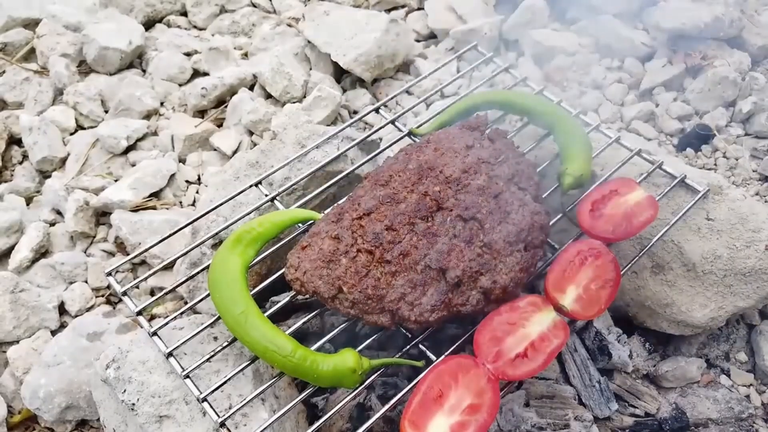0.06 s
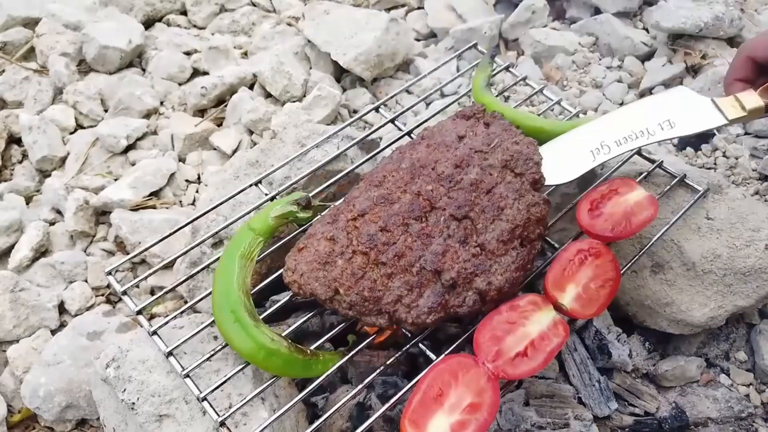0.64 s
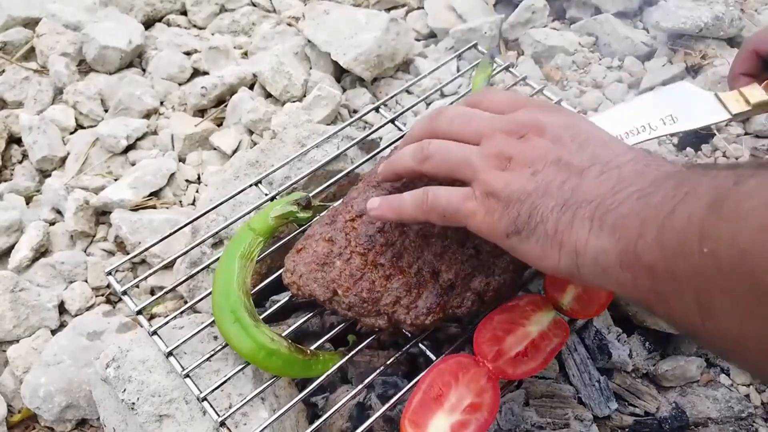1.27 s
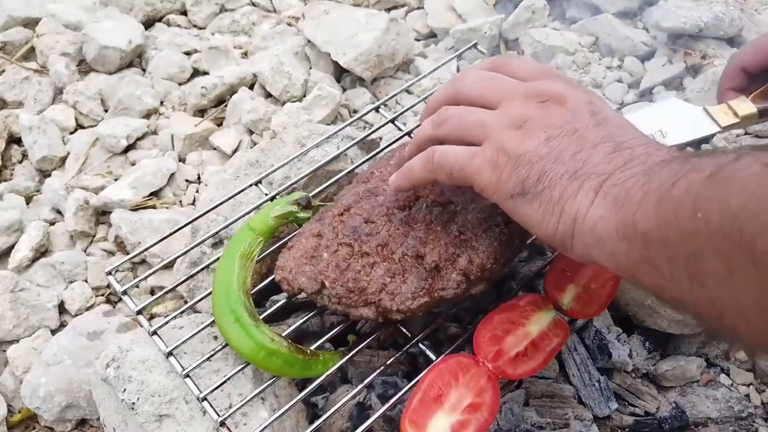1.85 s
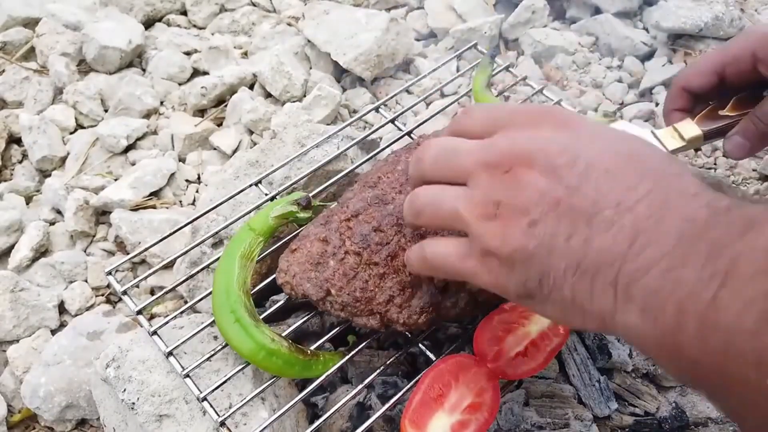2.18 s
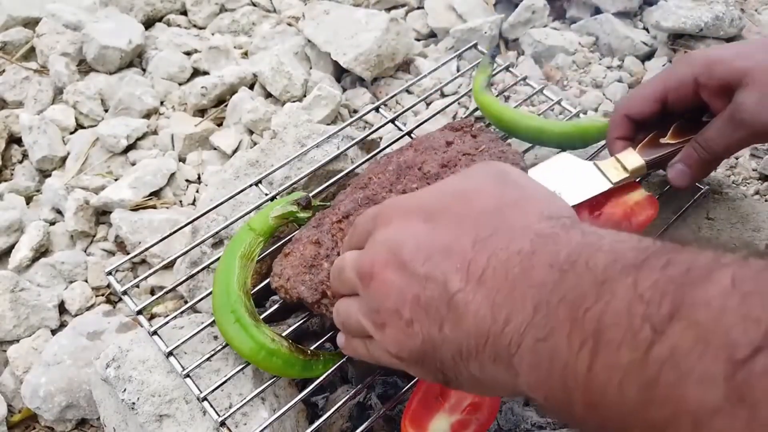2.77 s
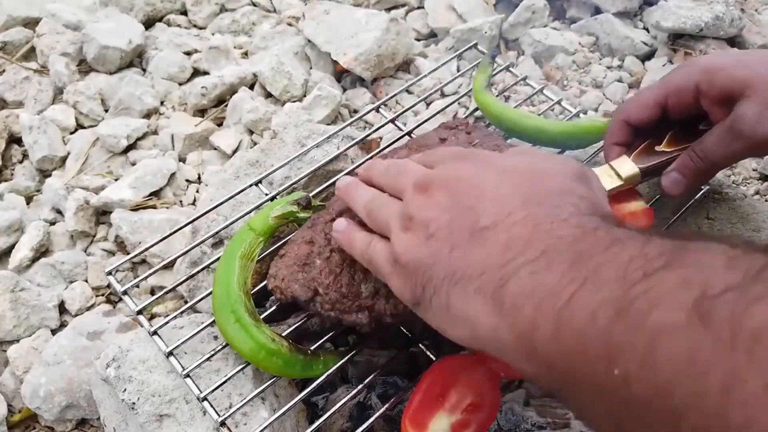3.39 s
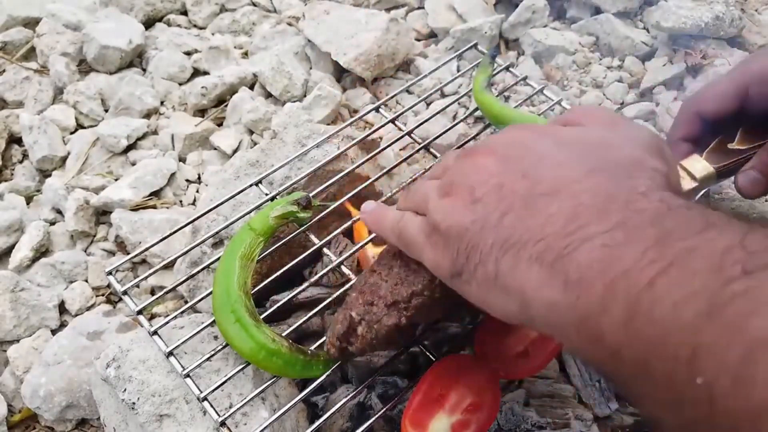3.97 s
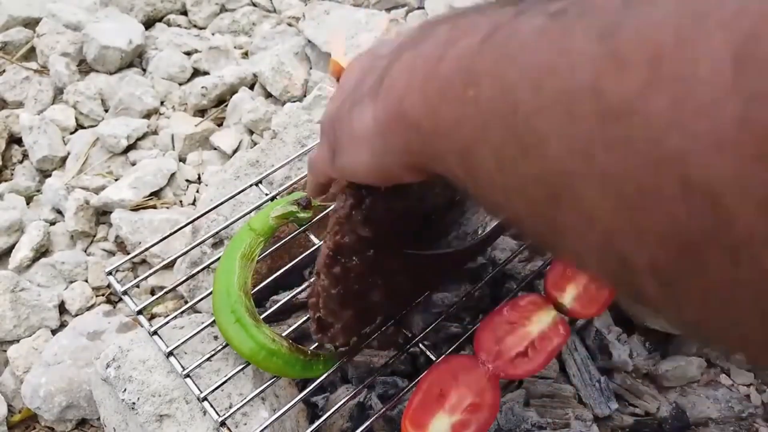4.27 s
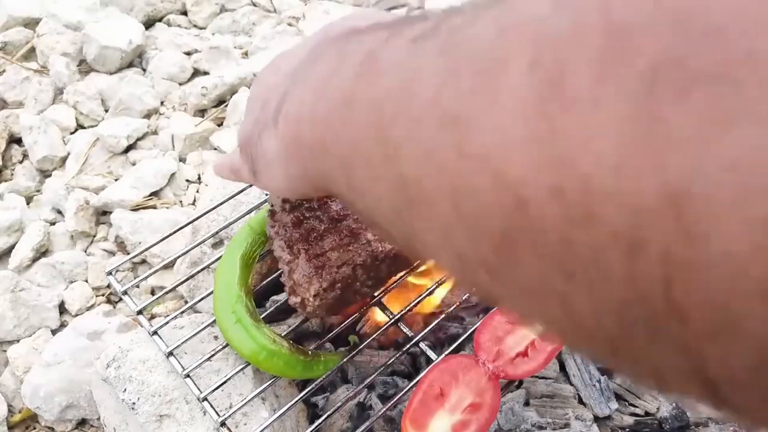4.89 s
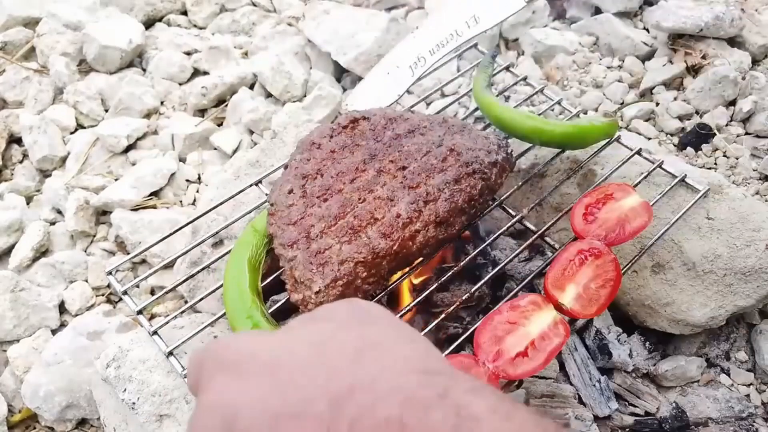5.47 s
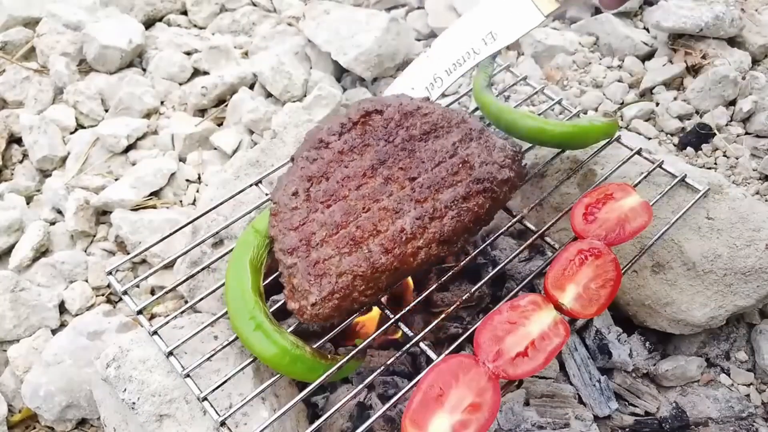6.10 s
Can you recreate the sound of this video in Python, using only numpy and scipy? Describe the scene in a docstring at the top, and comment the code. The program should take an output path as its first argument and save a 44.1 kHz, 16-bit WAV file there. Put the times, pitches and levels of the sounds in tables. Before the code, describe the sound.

Close up at an outdoor charcoal grill, a faint simmer of cooking meat grows into uneven waves of hissing, dotted with small pops of fat. A few light knocks come from a knife and the patty on the wires, while flames puff underneath. The meat is flipped and sears with a quick run of crackles, then eases back to a quiet sizzle. A low breeze brushes the microphone throughout.

```python
"""Outdoors at a charcoal grill, a meat patty sizzles on the wires as it is pressed and turned over.
Countless bursting bubbles of fat merge with a hiss of steam, surging as juice boils off the embers.
Cavities under a cupped hand and the tilted patty colour the sizzle by resonance. Single pops crack,
drops spit, the turned side sears, and knife and meat bump the grill. Beneath it all, flames flutter
and light air rumbles on the microphone."""
import sys
import numpy as np
from scipy import signal
from scipy.fft import rfft, irfft, next_fast_len
from scipy.io import wavfile

SR = 44100
rng = np.random.default_rng(int(sys.argv[2]) if len(sys.argv) > 2 else 0)


def dump(signal):
    """Clip the signal to [-1, 1] and save it as 16-bit WAV at the path in sys.argv[1]."""
    limited = np.clip(np.atleast_2d(signal).T, -1, 1)
    pcm = np.round(limited * 32767).astype(np.int16)
    wavfile.write(sys.argv[1], SR, pcm)


N = 275184
TIME = np.arange(N) / SR

# Spectral envelopes of four noise sources. Each row: frequency in Hz, gain in dB.
SIZZLE_SPECTRUM = [(500, -5), (1000, -5.5), (1350, -5.5), (1900, -4), (2250, -5), (3200, -1.5),
                   (4200, -0.5), (5200, 2.5), (6000, 0.5), (8600, 0.5), (10000, -6), (11800, -9.5),
                   (12800, -26), (15500, -25)]
SEAR_SPECTRUM = [(150, -7), (450, 6), (700, -8), (1030, -10), (1500, -3.5), (2300, -6.5), (5200, -10.5),
                 (8000, -15), (12000, -18.5), (13000, -23)]
FLAME_SPECTRUM = [(50, -13), (100, -2.5), (155, 0.5), (260, -2.5), (400, -9), (520, -13), (680, -8),
                  (850, -16.5), (1050, -28), (2000, -34)]
BREEZE_SPECTRUM = [(8, -4.5), (18, -3), (28, 0), (45, -9.5), (75, -13), (105, -19), (160, -20),
                   (500, -58.5)]
# The quiet, continuous simmer. Each row: time in seconds, level in dB, fine spray in relative dB.
SIMMER_LEVELS = [(0.0, -63, -4.5), (1.5, -62, -1), (2.5, -65.5, -1.5), (3.1, -58.5, -5.5), (5.6, -70, -5),
                 (6.24, -63, -3)]
# Juice boils off on the embers. Each row: start in seconds, level in dB, rise, hold and fade in seconds,
# fine spray and coarse bubbling in relative dB.
JUICE_SURGES = [(0.601, -50.5, 0.051, 0.09, .11, -9.5, -13.5), (0.898, -58, .11, 0.13, .12, 1, -6.5),
                (1.107, -53.5, 0.026, .03, 0.087, 3.5, -14), (1.792, -54, 0.081, 0.3, 0.44, -4.5, -9),
                (2.626, -57.5, 0.017, 0.034, 0.2, -5, -6.5), (3.246, -55.5, .14, .15, 0.87, 0.5, -2.5),
                (3.625, -48.5, 0.026, .02, 0.08, -4, -9.5), (3.792, -48, 0.026, 0.04, 0.13, -6, -6),
                (4.097, -49.5, 0.1, 0.057, 0.12, -7.5, -3.5), (4.267, -54, 0.097, 0.2, 0.18, -1, -6),
                (4.685, -57.5, 0.014, 0.52, 0.6, -8.5, -10.5), (4.99, -50.5, 0.053, 0.092, 0.11, -7, -27),
                (5.855, -60, 0.0098, 0.017, 0.021, -12, -1.5), (6.034, -60, 0.057, 0.044, 0.047, 1, -16)]
# Cavities under the hand and the tilted patty. Each row: centre in Hz, bandwidth in Hz, gain in dB.
HAND_RESONANCES = [(1054, 310, -7.5), (1340, 400, 8), (1960, 250, 2), (2230, 550, -4), (3250, 380, 4),
                   (5020, 720, 2.5), (6560, 470, 2)]
TILT_RESONANCES = [(5480, 330, 5), (8540, 2200, 3.5), (9900, 600, -6.5)]
# The loudest pops of fat and charcoal, and the bumps of knife and meat on the grill.
# Each row: start in seconds, relative level in dB, centre in Hz, 60 dB decay time in seconds.
FAT_POPS = [(0.183, -30, 2670, 0.0088), (0.523, -35.5, 7500, 0.058), (0.568, -37, 5300, .015),
            (2.178, -21.5, 6240, 0.0073), (2.186, -21.5, 6500, 0.011), (2.279, -28.5, 4300, .025),
            (2.452, -34, 4720, 0.014), (3.026, -27, 1970, 0.013), (3.477, -30, 1430, 0.065),
            (3.906, -25, 3750, 0.0098), (4.745, -26.5, 3250, 0.04), (4.756, -22, 6200, 0.021),
            (4.915, -27, 4830, 0.045), (5.016, -25, 4150, 0.026), (5.025, -29, 5030, 0.017),
            (5.063, -18.5, 4900, 0.0068), (5.091, -19.5, 7120, 0.018), (5.118, -27, 5360, 0.037),
            (5.288, -28, 5230, .012), (5.317, -31, 4770, 0.08), (5.583, -41, 5280, 0.059),
            (5.622, -41.5, 1900, 0.006), (5.852, -31, 5630, 0.041), (5.966, -33.5, 4360, 0.0073),
            (6.173, -33.5, 3500, 0.024)]
GRILL_BUMPS = [(2.451, -38.5, 676, 0.022), (3.026, -41.5, 770, 0.038), (3.041, -38.5, 1420, 0.02),
               (4.953, -39, 55, 0.09), (4.953, -37.5, 126.5, 0.16), (4.992, -37.5, 320, 0.03),
               (5.379, -38, 563, 0.02)]
# Drops flashing to steam, and puffs of flame.
# Each row: peak time in seconds, half length in seconds, centre in Hz, bandwidth in Hz, level in dB.
VAPOUR_JETS = [(0.202, 0.025, 970, 900, -58), (0.185, 0.012, 4200, 3000, -55.5),
               (0.194, 0.049, 413, 252, -59.5), (0.476, 0.012, 790, 296, -63),
               (0.75, 0.098, 725, 383, -59.5), (1.044, 0.05, 8340, 890, -52.5),
               (1.054, 0.074, 6340, 686, -53.5), (2.5, 0.077, 614, 450, -64.5),
               (3.672, 0.025, 2780, 890, -49), (4.198, 0.063, 4370, 2010, -49.5),
               (4.202, 0.017, 640, 397, -55), (5.089, 0.013, 5460, 300, -42),
               (6.125, 0.045, 3900, 1500, -54.5)]
# Fat catching fire, and gusts of air. Each row: start in seconds, level in dB, fade in seconds.
FAT_FLARES = [(0.8, -61.5, 0.11), (1.0, -61, 0.51), (2.02, -51.5, 0.13), (2.41, -55, 0.06),
              (3.25, -58.5, 0.6), (3.45, -55.5, 0.061), (3.638, -48, 0.11), (3.805, -46.5, 0.088),
              (3.92, -51, 0.086), (4.18, -51, 0.21), (4.935, -53, 0.38), (5.34, -60, 0.27)]
AIR_GUSTS = [(0.23, -55.5, .04), (0.78, -50, 0.39), (1.3, -51.5, 0.26), (2.05, -50.5, 0.23),
             (2.38, -48.5, .18), (3.22, -50, 0.048), (3.45, -50, 1), (3.93, -45.5, 0.14), (4.3, -54, 0.26),
             (4.5, -48, 0.056), (4.72, -48, 0.083), (4.92, -44, .07)]


def sizzle(strengths):
    """Steam noise and bursting bubbles superpose; bubbles of different sizes swell in separate bands."""
    steam = undb(-7.5) * rng.standard_normal(N)
    fizz = undb(-3.5) * clicks(per_s=5000, spread_db=2.5)
    spatter = undb(-7) * crackle(per_s=250, spread_db=4, fade_s=0.0023)
    ticking = undb(-7.5) * pores(low_hz=1225, high_hz=14000, width_hz=50, swell_db=9, count=52)
    sound = colour(steam + fizz + spatter + ticking, SIZZLE_SPECTRUM)
    sound = cavity(sound, HAND_RESONANCES, start_s=1.73, end_s=5.5)
    sound = cavity(sound, TILT_RESONANCES, start_s=4.1, end_s=5.28)
    coarse, rest = split(sound, hz=2350)
    middle, spray = split(rest, hz=6730)
    sputter_db = 0.37 * walk(per_s=25)
    return sum(unit(band) * strength * undb(sputter_db + 0.25 * walk(per_s=37))
               for band, strength in zip((coarse, middle, spray), strengths))


def boiling():
    """Incoherent sources add in power: simmer plus surges give coarse, middle and spray amplitudes."""
    times, *columns = np.transpose(SIMMER_LEVELS)
    base_db, fine_db = (np.interp(TIME, times, column) for column in columns)
    before_jump = TIME < 0.334  # here the sound cuts abruptly from faint to louder
    base_db, fine_db = base_db - 5 * before_jump, fine_db - 0.5 * before_jump
    power = undb([base_db - 5.5, base_db, base_db + fine_db]) ** 2
    for start, db, rise_s, hold_s, fade_s, spray_db, coarse_db in JUICE_SURGES:
        band_gains = undb([db + coarse_db, db, db + spray_db])
        power += np.outer(band_gains, swell(start, rise_s, hold_s, fade_s)) ** 2
    return np.sqrt(power)


def pores(low_hz, high_hz, width_hz, swell_db, count):
    """Each pore in the meat is a narrow resonator, driven by impulses that wax and wane on their own."""
    out = 0
    for hz in np.linspace(low_hz, high_hz, count) + rng.uniform(-100, 100, count):
        ticks = clicks(per_s=110, spread_db=3.5) * undb(swell_db * np.tanh(walk(per_s=9)))
        out = out + resonate(ticks, hz, width_hz)
    return unit(out)


def cavity(sound, modes, start_s, end_s, move_s=0.28):
    """An air cavity boosts some bands by resonance and weakens others, for as long as it is formed."""
    present = np.clip(np.minimum(TIME - start_s, end_s - TIME) / move_s + 0.5, 0, 1)
    for hz, width, db in modes:
        sound = sound + present * (undb(db) - 1) * resonate(sound, hz, width)
    return sound


def impacts(table, tone_db, crack_db, crack_t60_s):
    """Impulsive excitation: a pop or bump is a broadband crack, a rough burst and a damped ring."""
    out = np.zeros(N + SR)
    t = np.arange(SR // 5) / SR
    for (s, db, hz, t60), noise in zip(table, rng.standard_normal((len(table), len(t)))):
        body = unit(resonate(noise, hz, 0.61 * hz)) + undb(tone_db) * np.sin(2 * np.pi * hz * t)
        crack = unit(resonate(noise, hz, 2.8 * hz)) * undb(crack_db - 60 * t / crack_t60_s)
        hit = np.tanh(0.43 * (body * undb(-60 * t / t60) + crack))  # soft meat blunts the spikes
        start = int(s * SR)
        out[start:start + len(t)] += undb(db) * hit
    return colour(out[:N], [(8800, -6.5), (10500, -19), (12000, -12), (13000, -45)])


def stray_pops(count, db=-44, spread_db=3, hz=4220, t60_s=0.013):
    """Small pops are independent events after the first surge: rows of random time, level and pitch."""
    times = rng.uniform(JUICE_SURGES[0][0], N / SR, count)
    return [(s, db + spread_db * size, hz * 2 ** (0.5 * pitch), t60_s)
            for s, (size, pitch) in zip(times, rng.standard_normal((count, 2)))]


def spits():
    """Brief jets of vapour radiate grainy band-limited noise under a Gaussian envelope."""
    out = np.zeros(N)
    for s, half_s, hz, width, db in VAPOUR_JETS:
        grains = clicks(per_s=4000, spread_db=6)
        jet = resonate(resonate(grains, hz, width), hz, width)
        out += unit(jet) * undb(db) * np.exp(-0.5 * ((TIME - s) / half_s) ** 2)
    return out


def searing():
    """Vaporisation on the hot wires: the freshly turned side gives sparse, dry crackles that die away."""
    snaps = unit(colour(crackle(per_s=160, spread_db=4, fade_s=0.0007), SEAR_SPECTRUM))
    return snaps * undb(-60) * swell(start=4.84, rise_s=0.085, hold_s=0.17, fade_s=0.78)


def flames(bubbling):
    """Combustion noise: fat burns in ragged puffs over a soft roar that grows with the bubbling."""
    embers = undb(-64.5) * (bubbling / np.median(bubbling)) ** 0.49
    puffs = rng.standard_normal(N) + undb(-0.5) * crackle(per_s=170, spread_db=3, fade_s=0.0008)
    strength = add_swells(embers, FAT_FLARES, rise_s=0.022, hold_s=0.017)
    flutter = undb(1.86 * walk(per_s=28))
    return unit(colour(puffs, FLAME_SPECTRUM)) * strength * flutter


def breeze():
    """Turbulence: slow eddies press on the microphone as a low rumble, with a gust now and then."""
    rumble = unit(colour(rng.standard_normal(N), BREEZE_SPECTRUM))
    return rumble * add_swells(undb(-58), AIR_GUSTS, rise_s=0.033, hold_s=0.031)


def crackle(per_s, spread_db, fade_s):
    """Each bursting bubble releases a spray of noise whose power decays exponentially."""
    impulses = clicks(per_s, spread_db)
    decay = np.exp(-1 / (SR * fade_s))
    power = signal.lfilter([1 - decay], [1, -decay], impulses ** 2)
    return unit(np.sqrt(power) * rng.standard_normal(N))


def clicks(per_s, spread_db):
    """Shot noise: a Poisson train of impulses, mostly small and a few large, at rms 1."""
    occurs = rng.random(N) < per_s / SR
    size = np.minimum(rng.exponential(size=N), 4)
    sign = rng.choice([-1, 1], N)
    return unit(occurs * sign * undb(spread_db * size))


def swell(start, rise_s, hold_s, fade_s):
    """An envelope with a linear rise to 1, a hold and an exponential decay."""
    age = TIME - start
    return np.clip(age / rise_s, 0, 1) * np.exp(-np.maximum(age - rise_s - hold_s, 0) / fade_s)


def add_swells(base, table, rise_s, hold_s):
    """The amplitude of a base level and its swells, added in power."""
    power = sum((undb(db) * swell(start, rise_s, hold_s, fade_s)) ** 2 for start, db, fade_s in table)
    return np.sqrt(base ** 2 + power)


def walk(per_s):
    """Slow modulation interpolated between random values, at rms 1."""
    knots = rng.standard_normal(N // 10)
    return unit(np.interp(TIME * per_s, np.arange(len(knots)), knots))


def colour(x, points):
    """A minimum-phase filter with the given (Hz, dB) outline."""
    hz, db = np.transpose(points)
    size = next_fast_len(N + SR // 10) * 2
    freq = np.maximum(np.arange(size // 2 + 1) * SR / size, 1)
    gain = undb(np.interp(np.log(freq), np.log(hz), db))
    cepstrum = irfft(np.log(gain))
    cepstrum[1:size // 2] *= 2  # folding onto positive time makes the filter causal
    cepstrum[size // 2 + 1:] = 0
    return irfft(rfft(x, size) * np.exp(rfft(cepstrum)))[:N]


def resonate(x, hz, width_hz):
    """A second-order resonance with gain 1 at its centre."""
    hz = min(hz, SR / 3)
    q = hz / min(width_hz, SR / 3)
    return signal.lfilter(*signal.iirpeak(hz, q, fs=SR), x)


def split(x, hz):
    """A complementary crossover: the parts below and above a frequency."""
    low = signal.sosfiltfilt(signal.butter(2, hz, fs=SR, output="sos"), x)
    return low, x - low


def undb(db):
    """Decibels to amplitude ratio."""
    return 10 ** (np.asarray(db) / 20)


def unit(x):
    """Normalisation to rms 1."""
    return x / np.sqrt(np.mean(x ** 2))


def scene():
    """In a free field the close sources superpose without echo, here in one channel."""
    strengths = boiling()
    pops = undb(-4) * impacts(FAT_POPS + stray_pops(count=20), tone_db=2.5, crack_db=6.5,
                              crack_t60_s=0.0077)
    bumps = undb(2.5) * impacts(GRILL_BUMPS, tone_db=6.5, crack_db=3, crack_t60_s=0.0045)
    return (sizzle(strengths) + searing() + pops + bumps + spits() + flames(strengths[0]) + breeze())[None]


def record(dry):
    """Band limiting: a steep low-pass filter removes the highest treble."""
    top_hz = 15500
    return signal.sosfilt(signal.ellip(10, 0.1, 70, top_hz, fs=SR, output="sos"), dry)


dry = scene()
out = record(dry)
dump(out)
```